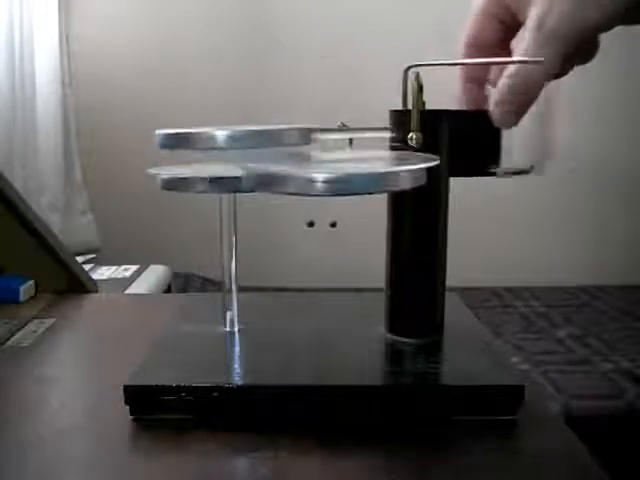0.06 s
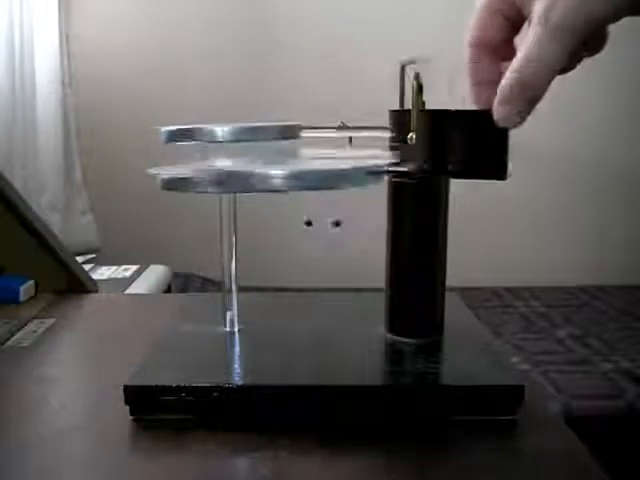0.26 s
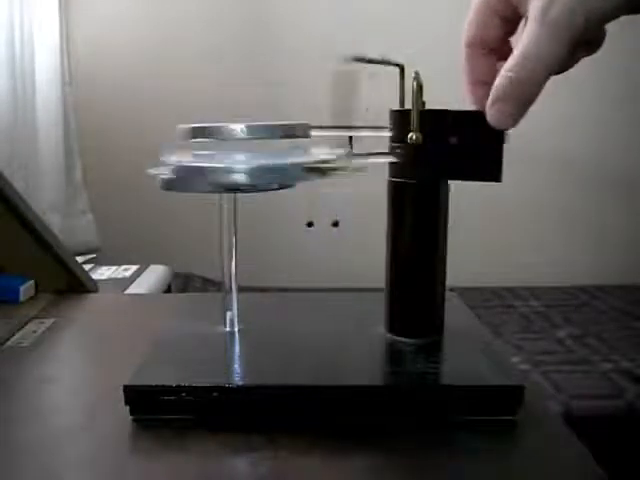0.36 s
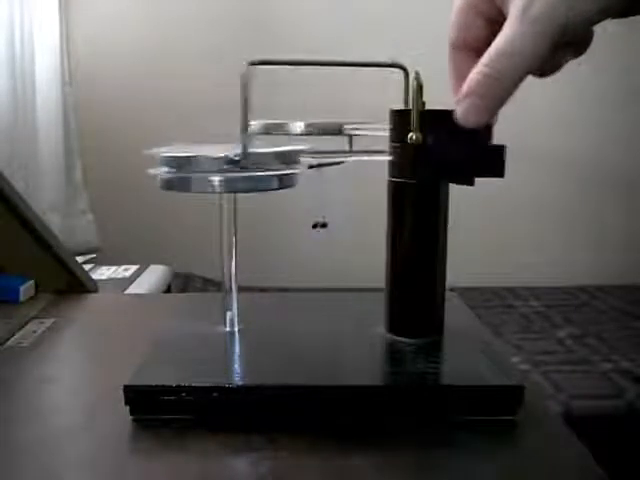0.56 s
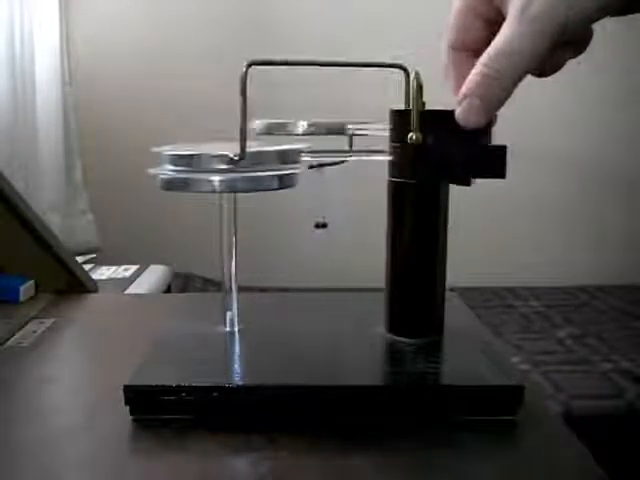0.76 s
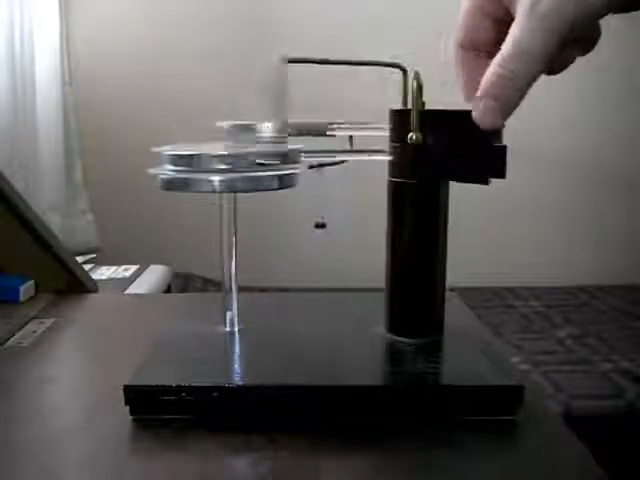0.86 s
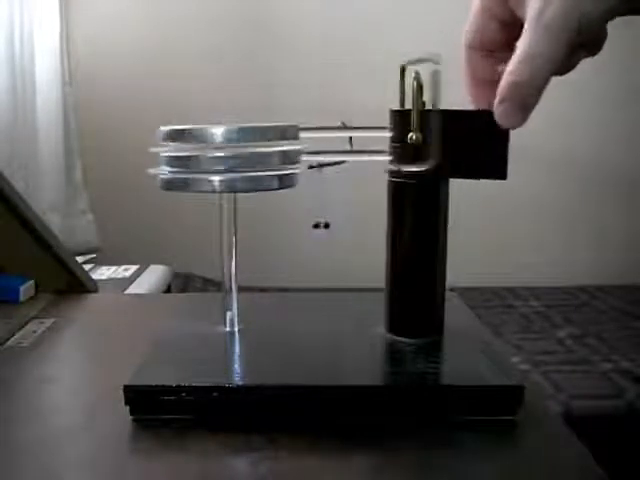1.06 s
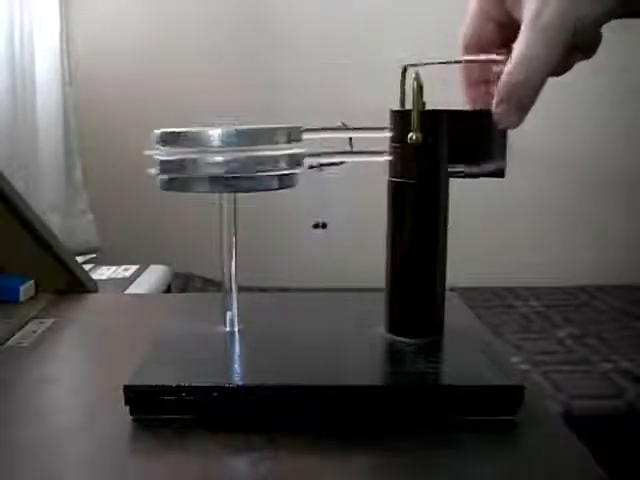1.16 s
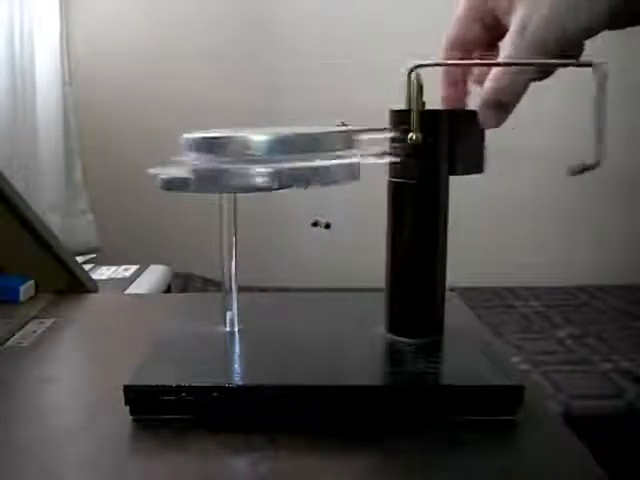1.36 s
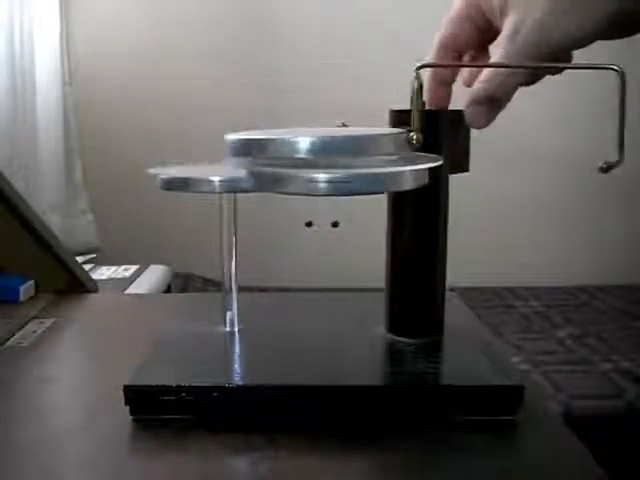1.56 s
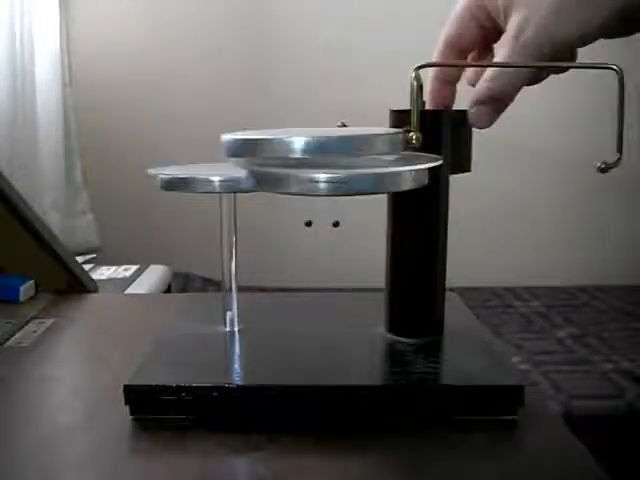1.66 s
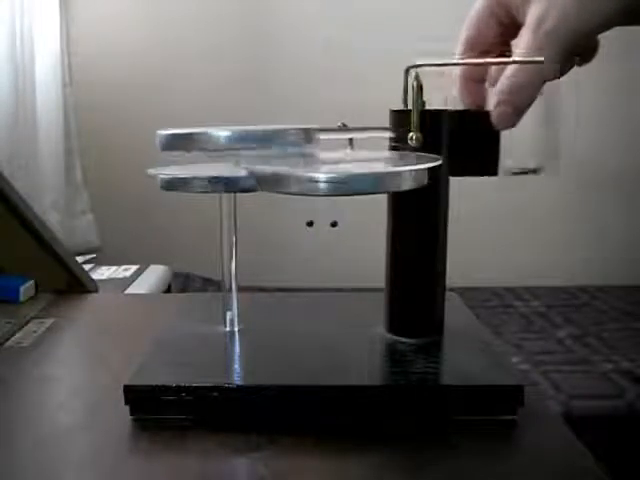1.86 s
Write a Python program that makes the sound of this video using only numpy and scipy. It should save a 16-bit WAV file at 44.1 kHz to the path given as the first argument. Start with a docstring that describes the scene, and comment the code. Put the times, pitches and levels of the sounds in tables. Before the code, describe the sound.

Metal discs click against wire contacts four times, with light rebounds and a short ring, ending on a softer double click. Dull rubbing from the hand-turned pivot fills the gaps, heard nearby in a small, quiet room.

```python
"""Sharp metal clicks in four groups stand out of a faint room rumble, hiss and thin electrical whine.
A hand turns a small tabletop machine whose arms swing metal discs past wire contacts.
Four contacts meet in turn: each scrapes, clicks, rebounds and sets the frame ringing.
The pivot rumbles dully between them, and a small quiet room answers each click."""
import sys
import numpy as np
from scipy import signal
from scipy.fft import rfft, irfft
from scipy.io import wavfile

SR = 44100
rng = np.random.default_rng(int(sys.argv[2]) if len(sys.argv) > 2 else 0)


def pcm_store(signal):
    """Save signal as 16-bit PCM."""
    levels = np.round(np.clip(np.atleast_2d(signal), -1, 1) * 32767)
    wavfile.write(sys.argv[1], SR, levels.astype(np.int16).T)


N = 83790
CUTOFF_HZ = 16200


def amp(db):
    """Decibels to gain."""
    return 10 ** (np.asarray(db) / 20)


def curve_at(points, hz):
    """A curve's value at hz, on a log-frequency axis."""
    f, value = np.transpose(points)
    return np.interp(np.log(hz + 1), np.log(f + 1), value)


def add(mix, start, sound):
    """Mixes a stereo sound in at start seconds."""
    part = mix[:, round(start * SR):][:, :sound.shape[1]]
    part += sound[:, :part.shape[1]]


def noise(colour, likeness, size, tilt_db=0):
    """Stereo noise of rms 1, tilted by tilt_db per octave; likeness 1 is mono, 0 is wide."""
    hz = np.fft.rfftfreq(size, 1 / SR)
    mid, side = np.exp(2j * np.pi * rng.random((2, len(hz))))
    mid *= np.sqrt((1 + likeness) / 2)
    side *= np.sqrt((1 - likeness) / 2)
    gain = amp(curve_at(colour, hz) + tilt_db * np.log2(hz + 1))
    band = (hz > 0) & (hz < CUTOFF_HZ)
    x = irfft(np.array([mid + side, mid - side]) * gain * band, size)
    return x / x.std()


def swell(t, rise, t60, start_gain=0):
    """Envelope: a linear attack, then a decay of 60 dB every t60 seconds."""
    attack = np.minimum(start_gain + (1 - start_gain) * t / max(rise, 1e-5), 1)
    return attack * np.exp(-np.log(1000) * np.maximum(t - rise, 0) / t60)


def partial(t, hz):
    """A sine, widened by a slight phase offset between left and right."""
    phase = 2 * np.pi * rng.random() + 0.11 * rng.standard_normal((2, 1))
    return np.sin(2 * np.pi * hz * t + phase)


# Room tone EQ, heavy in the lows: (f/Hz, level/dB)
BED_COLOUR = [(18, -36), (30, 7), (75, -3.5), (153, -8), (221, -5), (252, -8), (287, -12.5), (404, -12.5),
              (499, -14), (760, -19), (822, -19.5), (1460, -23.5), (1760, -25.5), (2230, -26.5),
              (5900, -30.5), (14800, -31), (16000, -40.5)]
# Room tone stereo image, widest in the mids: (f/Hz, left-right likeness)
BED_LIKENESS = [(50, 0.8), (500, 0.27), (3000, 0.2), (5000, 0.23), (6500, 0.99), (16000, 1)]
# Electrical whine: (f/Hz, rms level/dB)
WHINE_TONES = [(12134, -90), (15255, -73.5), (15735, -79)]


def background():
    """A steady bed of room rumble, hiss and thin electrical whine."""
    t = np.arange(N) / SR
    likeness = curve_at(BED_LIKENESS, np.fft.rfftfreq(N, 1 / SR))
    bed = amp(-56) * noise(BED_COLOUR, likeness, N)
    whine = sum(np.sqrt(2) * amp(db) * np.sin(2 * np.pi * (hz * t + rng.random()))
                for hz, db in WHINE_TONES)
    return bed + whine


# Reverb decay: (f/Hz, t60/s)
REVERB_DECAY = [(100, 0.75), (1000, 0.43), (2400, 0.37), (3700, 0.33), (8000, 0.3), (16000, 0.2)]
# Reverb EQ: (f/Hz, level/dB)
REVERB_COLOUR = [(100, 4.4), (500, -0.76), (1300, 3), (3500, -.5), (7000, 0.14), (11000, -1.1), (16000, 2)]
# Reverb stereo image: (f/Hz, left-right likeness)
REVERB_LIKENESS = [(100, 0.76), (1000, 0.77), (4000, 0.37), (7000, 1), (16000, 0.92)]


def room(send):
    """Diffuse reflections that build quickly and die fastest in the treble."""
    t = np.arange(SR // 2) / SR
    likeness = curve_at(REVERB_LIKENESS, np.fft.rfftfreq(len(t), 1 / SR))
    hz, times, spectrum = signal.stft(noise(REVERB_COLOUR, likeness, len(t)), SR, nperseg=256)
    decay = np.exp(-np.log(1000) * times / curve_at(REVERB_DECAY, hz)[:, None])
    tail = signal.istft(spectrum * decay, SR, nperseg=256)[1][:, :len(t)]
    tail *= np.clip((t - 0.002) / 0.014, 0, 1)  # 2 ms pre-delay, 14 ms build
    return signal.fftconvolve(send.mean(0)[None], tail / np.linalg.norm(tail[0]), axes=1)


# Pivot knocks and rubs: (t/s, rms level/dB, attack/s, t60/s, tilt/dB per octave)
PIVOT_RUBS = [(0.302, -54.5, 0.018, 0.55, -0.5), (.38, -46.5, 0.03, 0.57, -1.5),
              (.66, -47.5, 0.013, 0.47, 1.5), (1.101, -49, 0.016, 0.33, 0.5),
              (1.185, -52, 0.029, 0.23, 0.5), (1.645, -47, 0.029, 0.37, -0.5)]
# Their dark EQ: (f/Hz, level/dB)
PIVOT_COLOUR = [(25, -13), (45, 7), (75, 5.5), (100, -10), (140, 5.5), (200, 0.5), (450, 0.5), (750, -6.5),
                (1300, -34), (3000, -33), (16000, -60)]


def pivot():
    """The turning arms rub and knock dully through the base."""
    out, t = np.zeros((2, N)), np.arange(SR // 2) / SR
    for start, db, rise, t60, tilt_db in PIVOT_RUBS:
        rumble = noise(PIVOT_COLOUR, likeness=0.95, size=len(t), tilt_db=tilt_db)
        add(out, start, amp(db) * swell(t, rise, t60) * rumble)
    return out


# Body tones of frame and discs: (t/s, f/Hz, peak level/dB, attack/s, t60/s)
FRAME_RINGS = [(.222, 1126, -49, 0.017, 0.4), (.222, 77.4, -46.5, 0.0087, 0.27),
               (0.223, 206.4, -52, 0.021, 0.34), (0.226, 132, -53, 0.026, 0.3),
               (.222, 443, -44.5, 0.009, 0.13), (.312, 531, -45.5, 0.0055, .05),
               (.312, 668, -47, 0.0054, 0.03), (.373, 588, -50.5, 0.0038, 0.077),
               (.657, 75, -37, 0.0091, 0.27), (.657, 440, -48, 0.024, 0.46), (.657, 300, -47, 0.012, 0.23),
               (1.091, 444, -40, 0.014, 0.21), (1.091, 214.7, -48, 0.0081, 0.19),
               (1.091, 692, -42.5, 0.0024, 0.09), (1.139, 72.8, -51.5, 0.055, 0.89),
               (1.142, 44, -51.5, 0.068, 0.48), (1.539, 215.6, -40.5, 0.022, 0.11),
               (1.539, 669, -42, 0.025, 0.14), (1.594, 216, -43, 0.013, 0.12),
               (1.595, 667, -43.5, 0.0087, 0.19), (1.591, 1385, -49, 0.0011, 0.023)]


def frame():
    """Frame and discs take up each blow and ring on after it."""
    out, t = np.zeros((2, N)), np.arange(SR // 2) / SR
    for start, hz, db, rise, t60 in FRAME_RINGS:
        add(out, start, amp(db) * swell(t, rise, t60) * partial(t, hz))
    return out


# Crack EQ, by contact: (f/Hz, level/dB)
CRACK_COLOURS = { "first": [(200, -2), (500, -3.5), (1100, 1), (1900, -3), (3400, 3), (4600, -4),
                 (5500, -5.5), (7500, -12), (9500, 0), (11000, -11.5), (13500, -15), (16000, -26)],
                 "second": [(200, -5.5), (900, -9.5), (1500, 1), (2100, -4.5), (3700, 4.5), (6000, -8),
                 (8000, -9.5), (12000, -18.5), (16000, -21)], "third": [(200, -1.5), (650, -1),
                 (1000, -1.5), (2500, -1), (5000, -1), (7000, 5), (10000, -13), (13000, -9), (16000, -18)],
                 "fourth": [(200, 0.5), (1200, -1), (2100, -1.5), (3100, 7), (3700, -5.5), (4800, -7.5),
                 (7000, -10.5), (10000, -12), (16000, -41)]}
# Crack envelope, by contact: (level/dB, t60/s)
CRACK_ENVELOPES = {"first": (-28, 0.03), "second": (-32.5, 0.024), "third": (-31, 0.023),
                   "fourth": (-38, 0.029)}
# Modes of the metallic ping, by contact: (f/Hz, level/dB, t60/s)
PING_MODES = { "first": [(396, -32, 0.024), (1174, -37, 0.025), (2407, -23, 0.017), (3340, -42, .02),
              (3665, -40.5, 0.028), (4560, -31.5, 0.027), (6510, -42, 0.035), (9350, -38, 0.0065)],
              "second": [(364, -37, 0.013), (2600, -33.5, 0.019), (3150, -30, 0.011), (3734, -24, 0.011),
              (4400, -33, 0.011), (5066, -32, 0.012), (8380, -49.5, 0.035)], "third": [(460, -40, 0.04),
              (656, -43, 0.04), (1380, -54, .02), (2446, -39.5, 0.021), (3160, -39.5, .02),
              (4160, -42.5, 0.014), (6600, -36, .011), (8720, -32.5, 0.0053)], "fourth": [(573, -45, 0.052),
              (1141, -45.5, 0.058), (1444, -45, 0.016), (2617, -39, 0.021), (2877, -37, 0.016),
              (3153, -35.5, 0.016), (4670, -49, 0.033)]}


def click(contact, scrape, decay_scale, crack_db):
    """Metal scrapes briefly over metal and lets go: returns a noisy crack and a short ping."""
    t = np.arange(SR // 8) / SR
    base_db, crack_t60 = CRACK_ENVELOPES[contact]
    envelope = swell(t, scrape, crack_t60 * decay_scale, start_gain=0.47)
    burst = noise(CRACK_COLOURS[contact], likeness=0.91, size=len(t))
    crack = amp(base_db + crack_db) * envelope * burst
    ping = sum(amp(db) * swell(t, scrape, t60 * decay_scale) * partial(t, hz)
               for hz, db, t60 in PING_MODES[contact])
    return crack, ping


def tilt_and_lag(x, tilt_db, lag_ms):
    """Tilts the treble about 2500 Hz and delays the right channel against the left."""
    size = x.shape[1]
    hz = np.fft.rfftfreq(2 * size, 1 / SR)
    tilt = amp(tilt_db * np.log2(np.maximum(hz, 2400) / 2500))
    spread = np.clip(2 - hz / 7300, 0, 1) ** 2  # the lag fades out above 7300 Hz
    lag = np.exp(1j * np.pi * hz * spread * lag_ms / 1000 * np.array([[1], [-1]]))
    return irfft(rfft(x, 2 * size) * tilt * lag)[:, :size]


# Cue list of strikes and rebounds: (t/s, contact, level/dB, scrape/s, decay scale, crack trim/dB,
# treble tilt/dB per octave, reverb send/dB, pan left/dB, right lag/ms)
CLICK_CUES = [(0.2186, "first", 1.5, 0.0045, .9, -3.5, 1.05, -8, 1.5, -0.019),
              (0.3118, "first", -12.5, 0.0053, 0.49, -5, -3.5, -4, 0.5, 0.023),
              (0.372, "first", -15, 0.0043, 2.64, -0.5, -4.5, -5.5, 1, 0.033),
              (0.6505, "second", 2.5, 0.00087, 0.96, -3, 0, -1, 0, 0.029),
              (.6537, "second", -11.5, 0.0005, 0.99, 3, 3, -1, -8, 0.043),
              (0.6638, "second", -5.5, 0.0011, 1.15, 1.5, -2.5, -6, 6, .016),
              (0.7175, "second", -8, 0.00077, 1.16, 0, -2, -4, -0.5, 0.022),
              (1.0892, "third", 0.5, 0.00038, 0.68, 0, 0.9, -8.5, 3, -0.035),
              (1.0922, "third", -3.5, 0.00042, 1.34, -4, -3.5, -8.5, -2.5, -0.023),
              (1.5354, "fourth", -1.5, 0.0027, 1.06, 0, 0.5, -2, 0.5, 0.023),
              (1.5926, "fourth", -1, 0.0022, 0.45, -7, 0.5, -2, .5, 0.96)]


def contacts():
    """Discs strike the wires and rebound; the room gets more of the crack than of the ping."""
    out = np.zeros((2, N))
    for start, contact, db, scrape, decay_scale, crack_db, tilt_db, send_db, pan_db, lag_ms in CLICK_CUES:
        layers = click(contact, scrape, decay_scale, crack_db)
        crack, ping = (amp(db) * tilt_and_lag(x, tilt_db, lag_ms) for x in layers)
        pan = amp([[pan_db / 2], [-pan_db / 2]])
        add(out, start, (crack + ping) * pan)
        add(out, start, amp(send_db) * room(crack + amp(-8) * ping))
    return out


def scene():
    """The machine in its room."""
    return contacts() + frame() + pivot() + background()


def record(dry):
    """A steep low-pass takes the very top off the mix."""
    lowpass = signal.firwin(511, CUTOFF_HZ, window=("kaiser", 9), fs=SR)
    return signal.oaconvolve(dry, lowpass[None], "same")


dry = scene()
out = record(dry)
pcm_store(out)
```